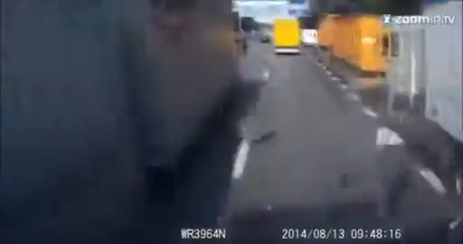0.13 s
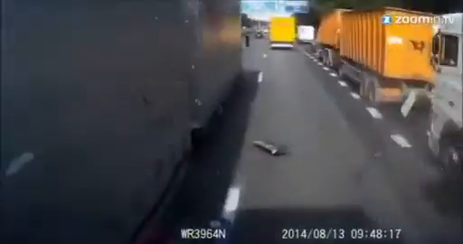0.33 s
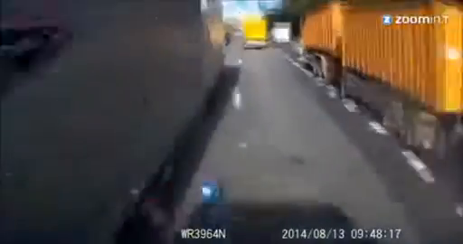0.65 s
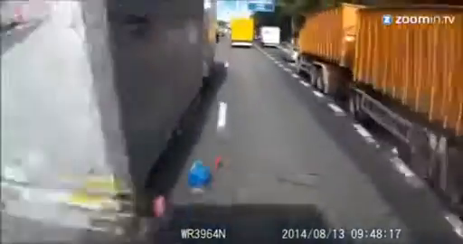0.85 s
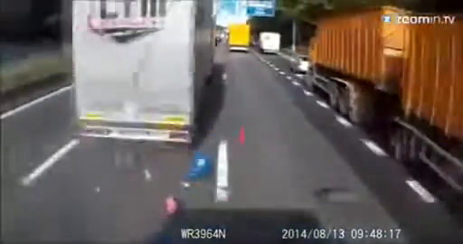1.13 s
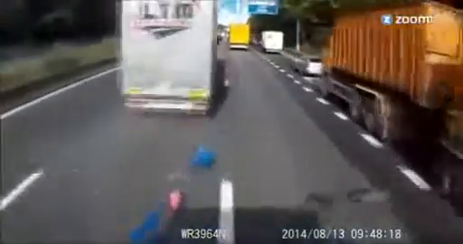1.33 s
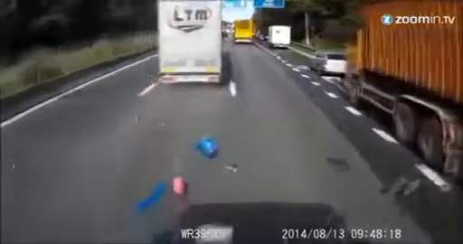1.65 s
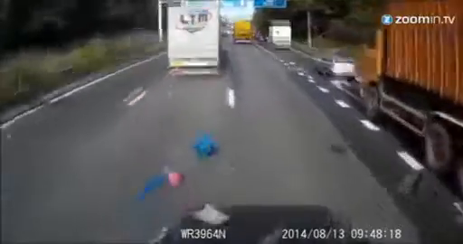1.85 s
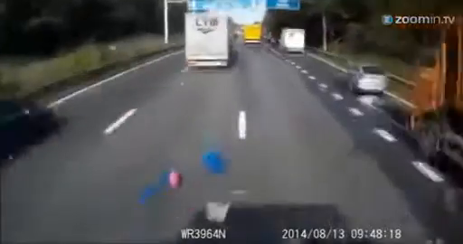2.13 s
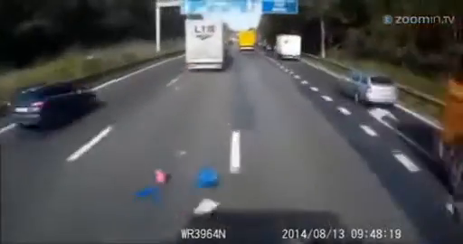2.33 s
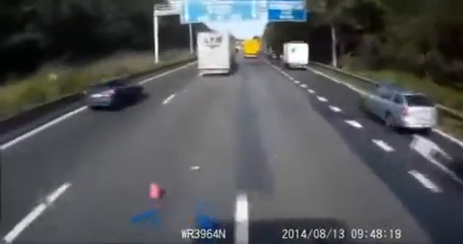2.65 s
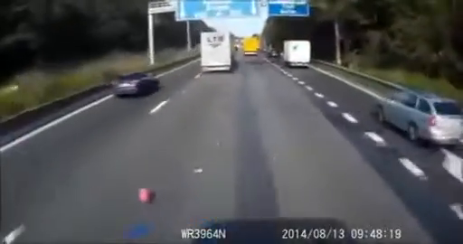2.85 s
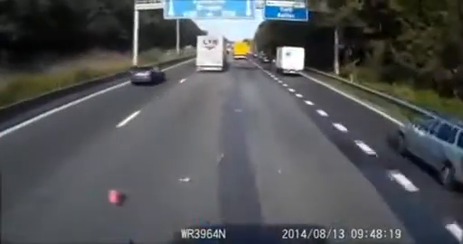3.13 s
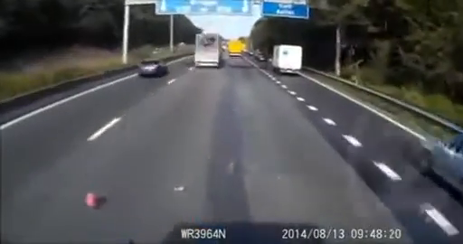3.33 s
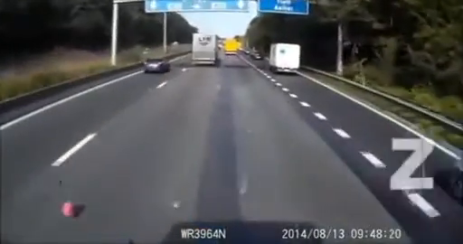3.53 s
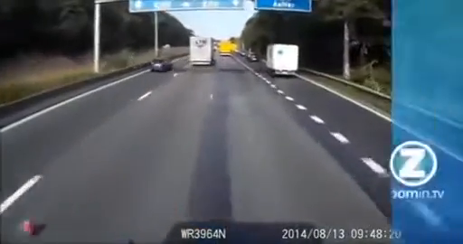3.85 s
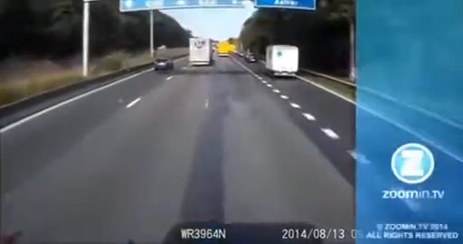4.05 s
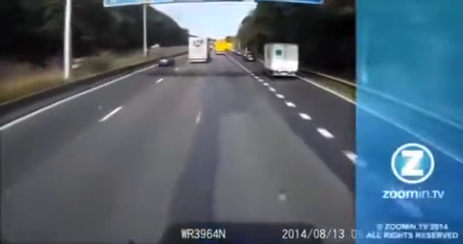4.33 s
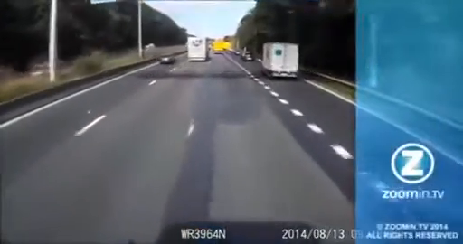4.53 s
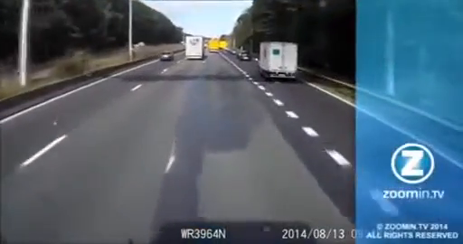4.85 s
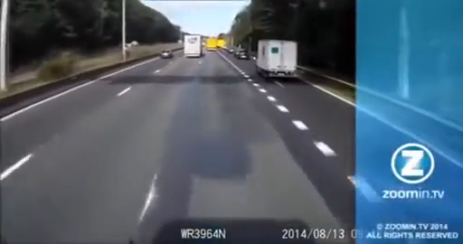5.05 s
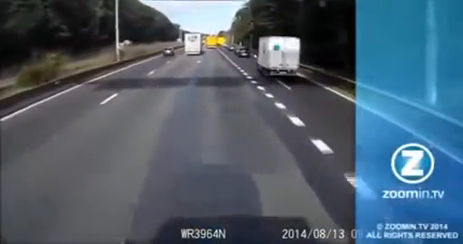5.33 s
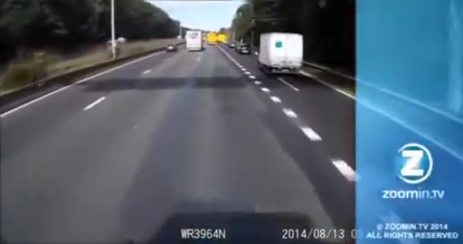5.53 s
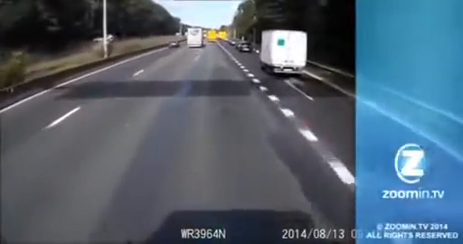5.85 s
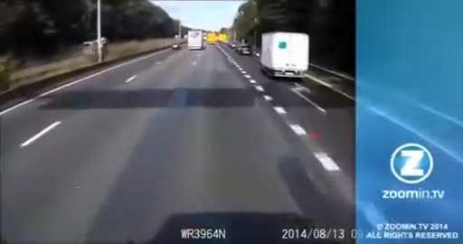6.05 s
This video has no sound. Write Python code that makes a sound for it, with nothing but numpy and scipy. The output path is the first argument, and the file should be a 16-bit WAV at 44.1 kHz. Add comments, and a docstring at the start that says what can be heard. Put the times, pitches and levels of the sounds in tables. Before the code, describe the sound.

A microphone behind the windscreen catches a motorway collision. Dense, overloaded crunching and booming body panels come first, with bright shards and grinding, then a short lull over engine and road. Another heavy bang starts a broken run of tumbling, clattering wreckage that weakens and ends with tiny ticks. The lorry rolls on with a deep cab rumble, faint wavering engine drone and gentle swells of tyre hiss.

```python
"""On a motorway, in the cab of a lorry: a crash. A small car is struck and dragged along.
Snaps and filtered noise make the panels crumple in bursts and the glass and plastic shatter;
fading tones make the groaning panels, a ringing steel part and small shards; the wreckage scrapes and tumbles away.
The engine, a wavering tone, sags under the blow; then the lorry rolls on with cab rumble and tyre roar,
both made of coloured noise."""
import sys
import numpy as np
from scipy import signal
from scipy.fft import rfft, irfft, next_fast_len
from scipy.io import wavfile

SR = 44100
rng = np.random.default_rng(int(sys.argv[2]) if len(sys.argv) > 2 else 0)


def transcribe(u):
    """Save the signal u as a 16-bit wav file named by the first command-line argument.

    u: samples, shape (n,) or (channels, n), limited to [-1, 1]; the rate is SR.
    q: integer samples, one column per channel.
    """
    v = np.clip(np.atleast_2d(u).T, -1, 1)
    q = np.round(v * 32767).astype(np.int16)
    wavfile.write(sys.argv[1], SR, q)


N = 273230
TIME = np.arange(N) / SR  # seconds

# engine drone over time: time_s, pitch_hz, level_db
ENGINE_DRONE = [(0, 123, -33.5), (.2, 119.5, -44.5), (.55, 109.9, -40.5), (1.15, 104.9, -47),
                (1.6, 111, -46), (3.1, 115.5, -51), (4.3, 117.5, -50), (6.2, 121.9, -55.5)]
CAB_HUM_HZ, CAB_HUM_DB = 330.3, -61

# colours of the road noises, relative levels: pitch_hz, level_db
RUMBLE_COLOUR = [(15, -36.5), (28, -12.5), (42, -2), (58, 3), (80, -1.5), (105, -5), (140, -7), (190, -14),
                 (270, -17.5), (400, -28), (800, -67.5)]
ROAR_COLOUR = [(150, -10), (260, -1.5), (400, 0.5), (600, -2), (760, 0.5), (890, -1), (1030, -2.5),
               (1180, -4.5), (1500, -4.5), (2000, -11.5), (3000, -27), (6000, -56)]
HISS_COLOUR = [(600, -9.5), (1400, 1), (1900, -4), (3000, -8.5), (4200, -17.5), (5200, -24), (6000, -31.5),
               (8500, -41), (15000, -45)]
# roar and hiss start at these levels and ease off
RUMBLE_DB, ROAR_START_DB, HISS_START_DB = -44, -50.5, -60.5
ROAR_EASE_DB_PER_S, HISS_EASE_DB_PER_S = 1.03, 1.75
# swells of tyre song and hiss: middle_s, half_length_s, song_level_db, hiss_level_db
TYRE_SWELLS = [(.95, .2, -57.5, -66), (3.42, 0.2, -58.5, -61), (4.0, 0.34, -77.5, -65),
               (4.53, .12, -58.5, -65.5), (4.82, .12, -63.5, -64.5), (5.33, 0.14, -56, -73),
               (5.6, 0.12, -56.5, -69)]
SONG_DB = -68.5  # tread song between the swells

# the wreck slides and grinds: start_s, end_s, grinding_level_db, panel_boom_level_db, splinters_level_db,
# run_out_t60_s (time to fade by 60 dB; the splinters fade sooner)
SLIDES = [(0, .06, -45, -45, -44, .3), (0.092, 0.4, -31, -36, -34, .7), (0.477, .69, -38, -39, -41.5, 0.91),
          (1.363, 1.613, -41, -40.5, -43.5, .7), (1.664, 1.835, -48.5, -49.5, -48.5, 0.94),
          (1.911, 2.08, -39, -41, -42.5, .6), (2.14, 2.266, -39.5, -38.5, -39.5, 1),
          (2.363, 2.497, -46, -45, -47, 0.83), (2.58, 3.035, -55.5, -58.5, -57, .4)]
SLIDE_ATTACK_S = 0.024

# shards: level against the splinters, loss per octave of pitch, average ring time to fade by 60 dB
SHARD_DB, SHARD_FALL_DB_PER_OCTAVE, SHARD_MEAN_T60_S = 1.5, 2.1, .14

# blows: peak_s, crunch_level_db, panel_boom_level_db, splinters_level_db, build_up_s
BLOWS = [(0.063, -35, -29.5, -37, .006), (0.081, -18, -20.5, -24.5, 0.014), (0.122, -32.5, -30, -49, .01),
         (0.172, -34.5, -32.5, -36, .005), (0.199, -30, -28.5, -39, 0.018), (0.257, -29, -40, -26, .006),
         (0.299, -25, -36, -26.5, 0.027), (0.36, -24.5, -26.5, -23, 0.011), (0.432, -38, -36, -33.5, .008),
         (0.46, -31, -52, -36, .005), (0.493, -47, -55, -33.5, .008), (0.571, -29, -41, -33.5, 0.043),
         (0.640, -31, -43, -34, 0.06), (0.857, -48, -50, -50, .006), (1.342, -34.5, -34, -35, 0.0034),
         (1.362, -22, -26.5, -24, 0.018), (1.382, -33.5, -31.5, -37.5, 0.016),
         (1.443, -34.5, -33.5, -39, 0.013), (1.561, -32.5, -33.5, -34.5, 0.055),
         (1.578, -27, -33, -30, 0.013), (1.771, -33, -37.5, -41, .008), (1.826, -44, -38.5, -48, 0.018),
         (1.950, -34.5, -45, -33.5, 0.021), (2.014, -33, -30.5, -37.5, 0.032),
         (2.126, -32, -37, -30, .0015), (2.172, -31, -34.5, -35.5, 0.033), (2.21, -34.5, -49, -39, 0.023),
         (2.312, -34, -40, -50, .013), (2.415, -40.5, -46.5, -38.5, 0.0033), (2.442, -48, -44.5, -46, .007),
         (2.615, -44.5, -47, -52, .006), (2.728, -47, -49, -65, 0.0043), (2.846, -45.5, -50, -44.5, 0.0067),
         (2.896, -47.5, -58, -52, .004), (2.938, -44, -61, -44, .01), (3.06, -62, -61, -57, .006)]
CRUNCH_T60_S = .2  # the crunch fades by 60 dB in this time after every blow
# colour of crumpling bodywork, relative levels: pitch_hz, level_db_per_hz
CRUMPLE_COLOUR = [(90, -15.5), (170, -12), (220, -8.5), (310, -5), (400, -3), (560, -4), (800, -5),
                  (1150, -4.5), (2200, -3), (3400, -2.5), (4800, -9), (6500, -19), (9500, -21.5),
                  (13000, -27), (15500, -29.5)]

# buckling panels groan and thump: start_s, pitch_hz, level_db, t60_s
GROANS = [(.075, 338, -30.5, .25), (.14, 410, -28.5, 0.4), (.195, 295, -30, 0.62), (.345, 300.2, -34, 0.94),
          (.36, 387.3, -29, 0.61), (1.352, 318, -21.5, .17), (1.355, 169.2, -30.5, 0.13),
          (2.005, 168, -34.5, 0.43), (2.49, 195.3, -39, 0.25)]

# tones of a ringing steel part: pitch_hz, level_db (against the knock), t60_s
STEEL_MODES = [(1960, -10, 0.43), (2230, -3.5, 0.39), (2408, 4.5, 0.33), (2422, -1, 0.54),
               (2730, -7.5, 0.48), (3120, -10, .4), (4150, -7, 0.35), (5600, -18.5, 0.84), (9390, -31, .4),
               (10660, -12, 0.43)]
# knocks on the steel part: start_s, level_db
STEEL_KNOCKS = [(.564, -30.5), (0.627, -34.5), (.70, -44.5)]
# tones of a small loose piece of metal or glass: pitch_hz, level_db (against the landing), t60_s
TINKLE_MODES = [(4450, 5, 0.12), (4861, -2, .18)]
# landings of the small piece as it bounces: start_s, level_db
TINKLE_LANDINGS = [(2.452, -45.5), (2.576, -51)]

# small knocks of loose bits: start_s, level_db
TICKS = [(1.061, -71), (1.136, -78.5), (3.099, -61), (3.166, -68), (4.427, -76), (4.885, -73), (5.259, -80)]

CUTOFF_HZ = 15500


def from_db(db):
    """Turn decibels into a plain gain."""
    return 10 ** (np.asarray(db) / 20)


def rms_one(x):
    """Scale a signal to an average power of one."""
    return x / np.sqrt(np.mean(x ** 2) + 1e-20)


def in_time(rows):
    """Draw straight lines between the rows of a table, one curve per column."""
    s, *columns = np.transpose(rows)
    return [np.interp(TIME, s, column) for column in columns]


def coloured(x, spectrum):
    """Shape how strong each pitch is in a steady signal; power of one."""
    size = next_fast_len(N)
    hz, db = np.transpose(spectrum)
    bins_hz = np.maximum(np.arange(size // 2 + 1) * SR / size, 1)
    gain = from_db(np.interp(np.log(bins_hz), np.log(hz), db))
    return rms_one(irfft(rfft(x, size) * gain, size)[:N])


def band(x, edges_hz, kind):
    """Keep only one range of pitches; power of one."""
    sos = signal.butter(N=3, Wn=edges_hz, btype=kind, fs=SR, output="sos")
    return rms_one(signal.sosfilt(sos, x))


def drift(rate):
    """Wander at random, with this many new values a second; power of one."""
    knots = rng.standard_normal(4096)
    return rms_one(np.interp(TIME * rate, np.arange(len(knots)), knots))


def dying(start, t60):
    """Fade from a given moment by 60 dB every t60 seconds, down to 120 dB below the start."""
    return (TIME >= start) * np.exp(-np.log(1000) * np.clip((TIME - start) / t60, 0, 2))


def engine(waver=0.0064, throb_db=3.0, hum_waver=0.0067):
    """The firing drone sags and recovers in pitch; a faint hum sits above it."""
    hz, db = in_time(ENGINE_DRONE)
    level = from_db(db + throb_db * drift(26))
    # adding up the changing pitch gives the phase of the wave
    drone = level * np.sin(2 * np.pi * np.cumsum(hz * (1 + waver * drift(27))) / SR)
    hum_hz = CAB_HUM_HZ * (1 + hum_waver * drift(40))
    hum = from_db(CAB_HUM_DB) * np.sin(2 * np.pi * np.cumsum(hum_hz) / SR)
    return drone + hum


def road(sing_hz=900, sing_width_hz=160):
    """The road shakes the cab; tyres roar, hiss and sing on the asphalt, heard through closed windows."""
    rumble = from_db(RUMBLE_DB)
    roar = from_db(ROAR_START_DB - ROAR_EASE_DB_PER_S * TIME)
    hiss = from_db(HISS_START_DB - HISS_EASE_DB_PER_S * TIME)
    song = from_db(SONG_DB)
    for s, half_length, song_db, hiss_db in TYRE_SWELLS:
        swell = np.exp(-.5 * ((TIME - s) / half_length) ** 2)
        # hypot adds the powers of two sounds
        song = np.hypot(song, from_db(song_db) * swell)
        hiss = np.hypot(hiss, from_db(hiss_db) * swell)
    edges_hz = [sing_hz - sing_width_hz / 2, sing_hz + sing_width_hz / 2]
    sing = song * band(rng.standard_normal(N), edges_hz, "band")
    layers = [(rumble, RUMBLE_COLOUR), (roar, ROAR_COLOUR), (hiss, HISS_COLOUR)]
    return sing + sum(gain * coloured(rng.standard_normal(N), colour) for gain, colour in layers)


def grinding(splinter_life=0.7):
    """Gains of the grinding, its boom and its splinters: each slide bites, holds and runs out."""
    power = np.zeros((3, N))
    life = np.array([[1], [1], [splinter_life]])
    for start, end, grind_db, boom_db, splinter_db, t60 in SLIDES:
        near = slice(int(max(start, 0) * SR), int((end + t60) * SR))
        t = TIME[near]
        bite = np.clip((t - start) / SLIDE_ATTACK_S, 0, 1)
        run_out = np.exp(-np.log(1000) * np.maximum(t - end, 0) / (t60 * life))
        levels = from_db([[grind_db], [boom_db], [splinter_db]])
        power[:, near] += (levels * bite * run_out) ** 2
    return np.sqrt(power)


def shards(splinters, count=300, spread_db=5.0, low_hz=1100, high_hz=14500):
    """Bits of metal, glass and trim spill from the wreck as it grinds; each rings at its own pair of pitches."""
    out = np.zeros(N)
    age = TIME[:SR // 4]
    for when, pitch, partner, size, life, phase in rng.random((count, 6)):
        start = int(when * BLOWS[-1][0] * SR)
        hz = low_hz * (high_hz / low_hz) ** pitch
        ring = np.sin(2 * np.pi * (hz * age + phase))
        ring += .5 * np.sin(2 * np.pi * hz * (1 - partner / 2) * age)
        # bits that ring higher are fainter
        db = SHARD_DB + spread_db * (2 * size - 1) - SHARD_FALL_DB_PER_OCTAVE * np.log2(hz / low_hz)
        fade = np.exp(-np.log(1000) * age / (SHARD_MEAN_T60_S * (.5 + life)))
        out[start:start + len(age)] += splinters[start] * from_db(db) * ring * fade
    return out


def fractures(per_s, spread_db, cab_t60, cab_db):
    """Metal gives way in a stream of snaps of very uneven size, each with a noisy tail in the cab."""
    sizes = from_db(spread_db * np.minimum(rng.exponential(1, N), 4)) * rng.choice([-1, 1], N)
    snaps = sizes * (rng.random(N) < per_s / SR)
    # the power of the tails keeps this share from one sample to the next
    keep = np.exp(-2 * np.log(1000) / (cab_t60 * SR))
    tail_power = signal.lfilter([1 - keep], [1, -keep], snaps ** 2)
    tails = np.sqrt(tail_power) * rng.standard_normal(N)
    return coloured(snaps + from_db(cab_db) * tails, CRUMPLE_COLOUR)


def wreck(grind, boom_hz=1150, splinter_hz=5600, splinter_life=0.81, boom_life=1.6,
          judder_db=0.5, catch_db=2.0, splinter_catch_db=3.0):
    """Blows build as metal gives way and die as it settles; grinding between them catches and slips."""
    scrape, boom, splinters = grind
    catch = drift(60)
    uneven = from_db(catch_db * catch)
    power = np.array([boom * uneven, scrape * uneven, splinters * from_db(splinter_catch_db * catch)]) ** 2
    for s, crunch_db, boom_db, splinter_db, build_up in BLOWS:
        near = slice(max(int((s - build_up) * SR), 0), int((s + CRUNCH_T60_S) * SR))
        age = TIME[near] - s
        rise = np.clip(1 + age / build_up, 0, 1)
        # the boom fades slower than the crunch, the splinters faster
        kinds = [(boom_db, boom_life), (crunch_db, 1), (splinter_db, splinter_life)]
        for k, (db, life) in enumerate(kinds):
            fade = np.exp(-np.log(1000) * np.maximum(age, 0) / (life * CRUNCH_T60_S))
            power[k, near] += (from_db(db) * rise * fade) ** 2
    # wide panels boom, folding metal crunches, glass and plastic splinter
    panels = band(fractures(per_s=2500, spread_db=2, cab_t60=0.22, cab_db=11.5), boom_hz, "low")
    snaps = fractures(per_s=3800, spread_db=2.5, cab_t60=0.066, cab_db=0)
    crunch = band(snaps, [boom_hz, splinter_hz], "band")
    parts = [panels, crunch, band(snaps, splinter_hz, "high")]
    return np.sum(np.sqrt(power) * parts, axis=0) * from_db(judder_db * drift(110))


def groans(waver=0.028, rough_db=0.0, swell_s=0.0019):
    """A large panel sounds its low mode, whose pitch wobbles as the sheet bends."""
    out = np.zeros(N)
    for s, hz, db, t60 in GROANS:
        swell = np.clip((TIME - s) / swell_s, 0, 1)
        phase = 2 * np.pi * np.cumsum(hz * (1 + waver * drift(70))) / SR
        out += from_db(db + rough_db * drift(90)) * swell * dying(s, t60) * np.sin(phase)
    return out


def steel(modes, knocks):
    """A hard part is knocked and rings; its tones start together, and close ones beat."""
    rattle = .2  # radians of random wobble in the wave
    out = np.zeros(N)
    age = TIME - knocks[0][0]
    for hz, db, t60 in modes:
        swing = np.sqrt(sum((from_db(knock_db) * dying(s, t60)) ** 2 for s, knock_db in knocks))
        out += from_db(db) * swing * np.sin(2 * np.pi * hz * age + rattle * drift(120))
    return out


def ticks(t60=.05, low_hz=3500, high_hz=8500):
    """Loose bits tick faintly: short bursts of high noise that start at once and fade."""
    noise = band(rng.standard_normal(N), [low_hz, high_hz], "band")
    return noise * sum(from_db(db) * dying(s, t60) for s, db in TICKS)


def scene():
    """Everything reaches one microphone behind the windscreen."""
    grind = grinding()
    metal = steel(STEEL_MODES, STEEL_KNOCKS) + steel(TINKLE_MODES, TINKLE_LANDINGS)
    crash = wreck(grind) + groans() + metal + shards(grind[2]) + ticks()
    return (crash + engine() + road())[None]


def record(dry):
    """The loudest peaks are rounded and the top is cut."""
    ceiling = .27
    top_cut = signal.ellip(12, .1, 80, CUTOFF_HZ, fs=SR, output="sos")
    return signal.sosfilt(top_cut, ceiling * np.tanh(dry / ceiling))


dry = scene()
out = record(dry)
transcribe(out)
```